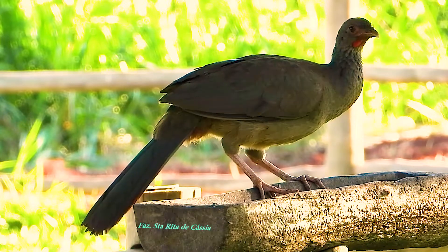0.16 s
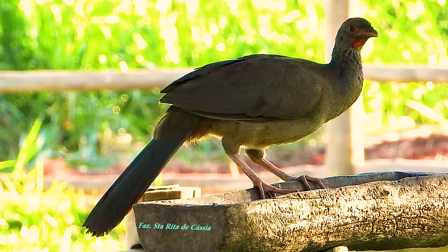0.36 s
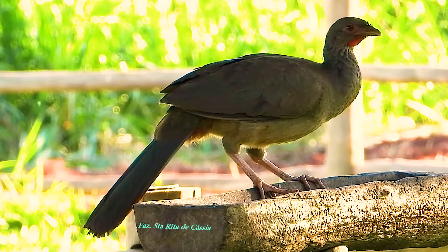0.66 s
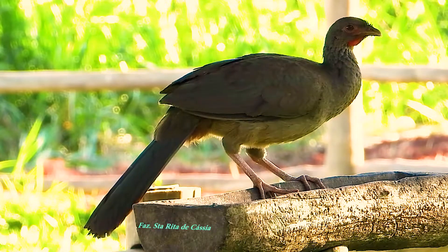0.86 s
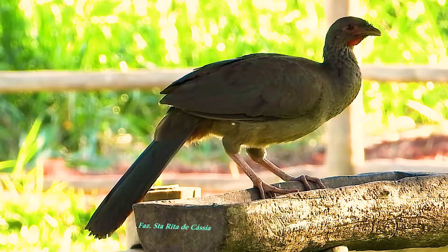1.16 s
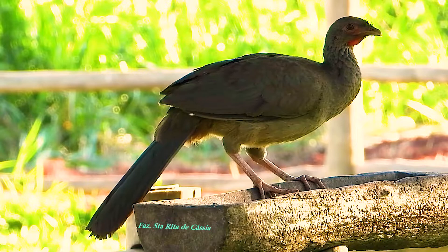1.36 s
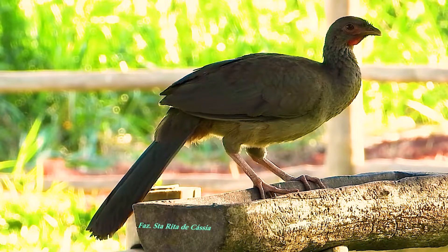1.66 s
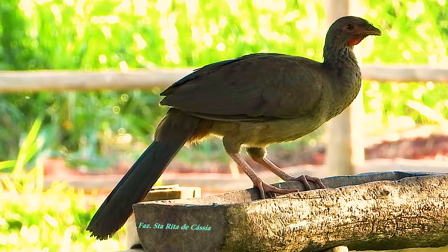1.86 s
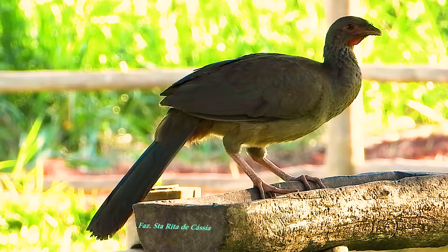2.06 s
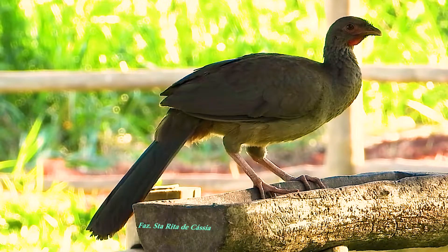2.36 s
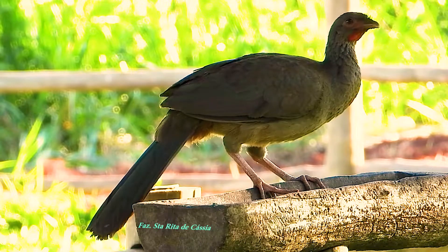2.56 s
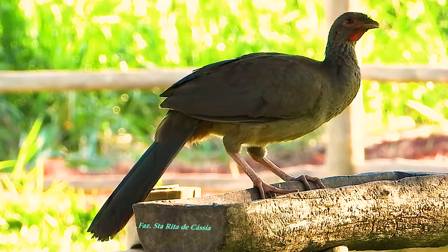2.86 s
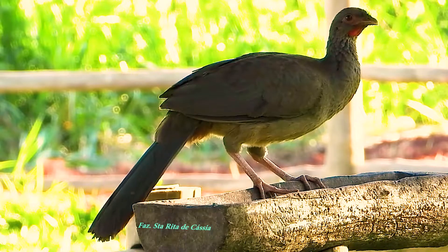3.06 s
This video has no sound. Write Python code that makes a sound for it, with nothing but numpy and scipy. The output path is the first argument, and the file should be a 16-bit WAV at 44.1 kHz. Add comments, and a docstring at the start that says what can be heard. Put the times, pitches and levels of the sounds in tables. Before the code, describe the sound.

A raucous, rasping chorus of large birds, rapid and uneven, arrives late, somewhat right of the microphones and blurred by echoes from trees and walls; before it, only faint insects, tiny chirps and a brief rustle.

```python
"""Insects shrill from the first moment over a low rumble and garden air, with other birds chirping here and there.
Then, some way off to the right of the microphones, chachalacas break into a harsh, rasping chorus.
Each syllable is a run of uneven pulses ringing in throat resonances, blurred by echoes from trees and walls.
Something rustles once before the chorus; the insects, air, rumble and a thin whine are filtered noise and a sine."""
import sys
import numpy as np
from scipy import signal
from scipy.io import wavfile
from scipy.ndimage import uniform_filter1d

SR = 44100
rng = np.random.default_rng(int(sys.argv[2]) if len(sys.argv) > 2 else 0)


def materialize(psi):
    """Save the field psi as 16-bit PCM at rate SR to the path in sys.argv[1].

    A 1-D psi becomes a single channel; in a 2-D psi each row is a channel.
    """
    bounded = np.clip(np.atleast_2d(psi).T, -1, 1)
    quanta = np.round(bounded * 32767).astype(np.int16)
    wavfile.write(sys.argv[1], SR, quanta)


N = 141561
T = np.arange(N) / SR  # time [s]

# Chorus syllables, levels before the distance gain CHORUS_DB:
# (start [s], length before release [s], pulse rate [Hz], roughness [0-1], ringing tone [Hz], tone level [dB],
#  then four throat levels [dB], one at each of REGISTERS_HZ)
SYLLABLES = [ (1.862, 0.029, 200, 0.48, 1150, -58, -51, -50, -56, -66),
             (1.886, 0.068, 225.3, 0.4, 1362, -43.5, -45.5, -39.5, -45.5, -49.5),
             (1.962, 0.06, 179.5, 0.34, 1177, -48, -50, -51, -46.5, -55),
             (2.007, 0.056, 200, 0.61, 3950, -53, -62, -54, -48, -53),
             (2.068, 0.06, 174.7, 0.55, 760, -56, -45, -46, -43, -56),
             (2.125, 0.054, 175.7, 0.42, 2610, -46, -48.5, -43, -47.5, -48.5),
             (2.286, 0.055, 199.6, 0.51, 1226, -43, -51.5, -43, -40.5, -49),
             (2.363, 0.044, 201.3, 0.69, 2334, -49, -52.5, -47.5, -42, -47),
             (2.412, 0.062, 207, 0.51, 1350, -45.5, -50, -45.5, -41.5, -48),
             (2.477, .11, 205.5, 0.61, 1260, -48, -52, -45, -42.5, -46),
             (2.599, 0.021, 281, 0.39, 840, -44.5, -51, -39, -44.5, -46),
             (2.62, 0.043, 292, 0.3, 3570, -43, -74, -43, -44.5, -44.5),
             (2.729, 0.054, 297.4, .18, 885, -40.5, -54, -37.5, -42.5, -45.5),
             (2.782, 0.041, 297.7, .22, 1212, -49, -49, -44.5, -40.5, -45.5),
             (2.812, .026, 298.5, .3, 875, -46, -52, -43, -47, -43.5),
             (2.858, .045, 257.5, .45, 1304, -47, -75, -48, -50, -48.5),
             (2.9, 0.065, 257, .45, 3560, -53.5, -64, -58, -62, -55.5),
             (3.04, 0.03, 234.4, 0.34, 2620, -43, -50.5, -38, -41.5, -46),
             (3.078, 0.036, 233.7, 0.31, 1144, -43.5, -58, -48, -46, -48.5),
             (3.12, 0.052, 201.4, 0.3, 4340, -49, -60, -52, -49, -55),
             (3.158, 0.049, 199.6, 0.51, 2730, -44, -52.5, -45.5, -54, -50.5)]
# Pitches at which the four throat levels of a syllable apply: (frequency [Hz])
REGISTERS_HZ = [850, 1250, 2700, 4000]
# Throat resonances of the calls: (centre [Hz], width [Hz], level relative to the syllable [dB])
THROAT = [(746, 75, -7.5), (856, 76, -4.5), (1100, 56, -8.5), (1203, 69, -4), (1349, 80, -6.5),
          (1612, 134, -12), (1825, 130, -11.5), (2305, 160, -9.5), (2606, 78, -6), (2803, 160, -6),
          (3149, 92, -4), (3597, 100, -4), (3936, 290, -2.5), (4340, 55, -4), (4827, 155, -6.5),
          (5640, 520, -12)]
ATTACK_S, RELEASE_S = 0.016, 0.012
THROAT_SHIFT = 0.011  # spread of each resonance between syllables, as a share of its pitch
TONE_WAVER, TONE_FLUTTER_DB = 0.069, 3  # waver is a share of pitch at full roughness
HISS_HZ, HISS_DB = 12000, -14.5  # breathy top, relative to the highest register
CHORUS_DB, CHORUS_PAN_DB = -3, 4
ECHO_DB, ECHO_PAN_DB = -0.5, 3


def chachalacas():
    """Each syllable swells, holds and dies away, with its own balance of resonances and one ringing tone."""
    size, lead_in_s = SR // 3, 0.05
    chorus = np.zeros(N + SR)
    t = np.arange(size) / SR - lead_in_s
    for start_s, length, pulse_hz, rough, tone_hz, tone_db, *levels in SYLLABLES:
        source = syrinx(pulse_hz, np.clip(rough, 0, 1), size)
        attack = np.clip(t / ATTACK_S, 0, 1)
        envelope = attack * np.exp(-np.maximum(t - length, 0) / RELEASE_S)

        hiss = rms_one(resonate(source, HISS_HZ, HISS_HZ))
        voice = from_db(HISS_DB + levels[-1]) * hiss
        tone = wavering_tone(tone_hz, TONE_WAVER * rough, TONE_FLUTTER_DB)[:size]
        voice = voice + from_db(tone_db) * tone
        for hz, width, db in THROAT:
            ring = resonate(source, hz * (1 + THROAT_SHIFT * rng.standard_normal()), width)
            # unit power over the audible part of the syllable
            ring /= np.sqrt(np.average(ring ** 2, weights=envelope ** 2))
            register_db = np.interp(np.log(hz), np.log(REGISTERS_HZ), levels)
            voice = voice + ring * from_db(db + register_db)

        first = int((start_s + t[0]) * SR)
        chorus[first:first + size] += voice * envelope
    direct = from_db(CHORUS_DB) * chorus[:N]
    echoes = from_db(ECHO_DB) * pan(ECHO_PAN_DB) * garden(direct)
    return direct * pan(CHORUS_PAN_DB) + echoes


# At full roughness: spread of log pulse gaps, spread of pulse strength, share of rasp
JITTER, SHIMMER_DB, RASP = 0.22, 5, 0.85
RASP_S = 0.0023  # decay time of the air after each pulse
RATTLE_HZ, RATTLE_DB = 129.5, 3.5  # random turns per second, spread at full roughness


def syrinx(pulse_hz, rough, size):
    """Uneven pulses, each followed by a short rasp of air, swelling and dropping in uneven bursts when rough."""
    gaps, strengths = rng.standard_normal((2, 200))
    gap_s = np.exp(JITTER * rough * gaps) / pulse_hz
    at = (np.cumsum(gap_s) * SR).astype(int)
    inside = at < size
    pulses = np.zeros(size)
    pulses[at[inside]] = from_db(SHIMMER_DB * rough * strengths[inside])

    puffs = signal.lfilter([1], [1, -np.exp(-1 / (RASP_S * SR))], pulses)
    air = puffs * rng.standard_normal(size)
    rattle = from_db(RATTLE_DB * rough * drift(RATTLE_HZ)[:size])
    return (rms_one(pulses) + RASP * rough * rms_one(air)) * rattle


GARDEN_T60_S, ECHO_DELAY_S = 0.61, 0.012
ECHO_SPREAD = 0.59  # strength of the left-right difference against the shared part


def garden(x):
    """Scattered echoes from trees and walls, dying away exponentially and partly shared by both sides."""
    t = T[:SR]
    reflections = rng.standard_normal((2, SR))
    reflections = reflections * (rng.random((2, SR)) < 0.05)  # sparse
    mid, side = reflections * (t > ECHO_DELAY_S) * from_db(-60 * t / GARDEN_T60_S)
    echoes = mid + ECHO_SPREAD * side * [[1], [-1]]
    echoes /= np.sqrt(np.sum(echoes ** 2, axis=1, keepdims=True))
    return signal.fftconvolve(x[None], echoes, axes=1)[:, :N]


# Other birds about the garden:
# (start [s], length [s], start pitch [Hz], end pitch [Hz], hoarseness [share of pitch], level before the swell [dB])
CHIRPS = [(0.217, 0.033, 2330, 2210, 0.037, -56), (.228, 0.033, 3600, 4250, .035, -56.5),
          (.74, 0.043, 1700, 1844, 0.084, -62), (0.769, .08, 2900, 4350, .015, -58),
          (0.908, 0.019, 2300, 2360, .04, -52), (1.138, .062, 4720, 4660, .028, -52),
          (1.134, 0.067, 3310, 3250, 0.026, -55.5), (1.22, .016, 4500, 3950, .02, -53.5),
          (1.263, .016, 4050, 4120, .02, -58), (1.675, 0.097, 1260, 1310, .04, -55.5),
          (1.763, 0.046, 2694, 2670, 0.0167, -52.5), (2.366, 0.019, 6070, 5740, 0.016, -41.5),
          (2.772, .088, 2900, 3010, .05, -38), (2.855, .085, 2120, 1980, .06, -48),
          (2.92, .105, 2000, 1975, .028, -48.5), (2.904, 0.14, 1780, 1770, 0.071, -48.5)]
TRILL_HZ, TRILL_UNEVEN = 51.8, 0.147
TRILL_PER_HOARSENESS = 12  # hoarser notes trill more deeply
CHIRP_FLUTTER_DB, CHIRP_ECHO_DB = 2.5, -3


def other_birds():
    """Whistles and hoarse, trilled squeals that glide from one pitch to another, with garden echoes."""
    notes = 0
    for start_s, length, start_hz, end_hz, hoarse, db in CHIRPS:
        u = np.clip((T - start_s) / length, 0, 1)  # progress through the note
        trill_hz = TRILL_HZ * (1 + TRILL_UNEVEN * drift(TRILL_HZ))
        beat = np.cos(2 * np.pi * np.cumsum(trill_hz) / SR)
        trill = 1 + np.clip(TRILL_PER_HOARSENESS * hoarse, 0, 1) * beat
        glide_hz = start_hz + (end_hz - start_hz) * u
        note = rms_one(wavering_tone(glide_hz, hoarse, CHIRP_FLUTTER_DB) * trill)
        swell = np.sqrt(2 * u * (1 - u))
        notes = notes + note * swell * from_db(db)
    return notes + from_db(CHIRP_ECHO_DB) * garden(notes)


# Brushes of the rustle:
# (peak time [s], rise [s], decay [s], centre [Hz], width [Hz], level at the peak [dB])
BRUSHES = [(1.474, 0.0034, .011, 2530, 900, -49), (1.490, 0.0018, 0.0053, 4570, 1700, -43),
           (1.492, 0.0028, .008, 11500, 3800, -48.5), (1.496, 0.038, 0.03, 7140, 8600, -49),
           (1.535, .03, .035, 13600, 3200, -60)]
RUSTLE_ECHO_DB = -11


def rustle():
    """A quick run of noise brushes, dull first and bright last, with a snap, as of feathers or a leaf."""
    brushes = sum(swish(*brush) for brush in BRUSHES)
    return brushes + from_db(RUSTLE_ECHO_DB) * garden(brushes)


# A faint high hiss that comes and goes:
# (peak time [s], rise [s], decay [s], centre [Hz], width [Hz], level at the peak [dB])
HIGH_HISS = (2.5, 0.26, 0.6, 9300, 1700, -59)


def high_hiss():
    """One slow swell of high noise, alike on both sides."""
    return swish(*HIGH_HISS)


# Far insect chorus: (centre [Hz], width [Hz], level relative to INSECT_DB [dB])
INSECTS = [(6454, 91, -4.5), (6626, 84, -2.5), (6640, 90, -12.5), (6770, 40, -9), (6558, 720, 1),
           (5363, 230, -15.5)]
INSECT_DB, INSECT_PAN_DB, INSECT_THROB_DB = -50.5, 1.6, 1


def insects():
    """Many far insects merge into a few throbbing, shrill bands of noise."""
    chorus = 0
    for hz, width, db in INSECTS:
        band = rms_one(resonate(rng.standard_normal((2, N)), hz, width))
        chorus = chorus + from_db(db + INSECT_THROB_DB * drift(140)) * band
    return from_db(INSECT_DB) * pan(INSECT_PAN_DB) * chorus


# Spectrum of the garden air: (frequency [Hz], relative level per Hz [dB])
AIR = [(100, 0.5), (150, -4), (220, -7.5), (320, -6), (500, -5.5), (1000, -8), (1600, -8.5), (2400, -6),
       (3500, -10), (5500, -7.5), (8000, -13.5), (12000, -16), (15500, -19.5)]
# How alike the air is at the left and right microphones: (frequency [Hz], likeness [-1 to 1])
LIKENESS = [(120, 1), (240, 0.91), (480, 0.44), (950, 0.17), (3000, 0.26), (7500, 0.082), (11000, 0.24),
            (15000, 0.89)]
AIR_DB, AIR_FLICKER_DB = -51.5, 0.4


def garden_air():
    """Stereo noise in roughly half-octave bands, each with its own flicker and left-right likeness."""
    edges = 85 * 2 ** (np.arange(17) / 2.1)
    air = 0
    white = rng.standard_normal((2, 2, N))
    for k, (low, high) in enumerate(zip(edges, edges[1:])):
        hz = (low + high) / 2
        mid, side = resonate(white[k % 2], hz, high - low)
        alike = np.clip(at_hz(LIKENESS, hz), -1, 1)
        band = np.sqrt(1 + alike) * mid + np.sqrt(1 - alike) * side * [[1], [-1]]
        air = air + from_db(at_hz(AIR, hz) + AIR_FLICKER_DB * drift(25.1)) * band
    return from_db(AIR_DB) * rms_one(air)


# Course of the rumble: (time [s], level [dB])
RUMBLE_LEVEL = [(0, -58.5), (.55, -59.5), (.75, -55.5), (1.0, -60), (1.63, -60), (1.68, -66), (2.0, -64.5),
                (2.25, -60.5), (2.45, -64), (2.86, -56.5), (2.95, -62), (3.21, -59)]
# Bands of the rumble: (centre [Hz], width [Hz], relative level [dB])
RUMBLE = [(59.2, 13, 0.5), (93.4, 27, -7), (32, 48, -16)]
# Steady far drone: (centre [Hz], width [Hz], level [dB])
DRONE = [(151, 37, -73.5), (312.5, 62, -70)]


def rumble():
    """Low bands of noise that follow a level course, over a faint drone, alike on both sides."""
    low = 0
    for hz, width, db in RUMBLE:
        noise = rng.standard_normal(N + SR)
        low = low + from_db(db) * rms_one(resonate(noise, hz, width)[SR:])  # skip the filter's build-up
    low = low / np.sqrt(uniform_filter1d(low ** 2, size=3000) + 1e-9)  # even out before the level course
    drone = sum(from_db(db) * rms_one(resonate(rng.standard_normal(N), hz, width)) for hz, width, db in DRONE)
    return low * from_db(np.interp(T, *np.transpose(RUMBLE_LEVEL))) + drone


def electrical_whine():
    """A thin, steady sine near the top of hearing."""
    whine_hz, whine_db = 15735, -66.5
    return from_db(whine_db) * np.sin(2 * np.pi * whine_hz * T) * np.sqrt(2)


def wavering_tone(hz, waver, flutter_db):
    """A tone whose pitch and strength shake quickly; unit power."""
    shaken_hz = hz * (1 + waver * drift(800))
    tone = np.sin(2 * np.pi * np.cumsum(shaken_hz) / SR)
    return rms_one(tone * from_db(flutter_db * drift(220)))


def swish(peak_s, rise_s, decay_s, hz, width_hz, db):
    """A band of noise that swells to a peak and dies away."""
    envelope = np.exp(-np.maximum(peak_s - T, 0) / rise_s - np.maximum(T - peak_s, 0) / decay_s)
    return from_db(db) * envelope * rms_one(resonate(rng.standard_normal(N), hz, width_hz))


def resonate(x, hz, width_hz):
    """A resonance with steep skirts."""
    band = [max(hz - width_hz / 2, 10), hz + width_hz / 2]
    return signal.sosfilt(signal.butter(2, band, "band", fs=SR, output="sos"), x + 1e-18)


def drift(rate):
    """Random wander of spread 1, with straight lines between `rate` random points a second."""
    return rms_one(np.interp(T * rate, np.arange(4000), rng.standard_normal(4000)))


def from_db(db):
    """Decibels to gain."""
    return 10 ** (np.asarray(db) / 20)


def rms_one(x):
    """Scale to unit power."""
    return x / np.sqrt(np.mean(x ** 2) + 1e-20)


def at_hz(points, hz):
    """Read a table on a log-frequency axis."""
    f, v = np.transpose(points)
    return np.interp(np.log(hz), np.log(f), v)


def pan(db):
    """Left and right gains; positive leans right."""
    return from_db(db * np.array([[-1], [1]]))


def scene():
    """Birds and a rustle over the garden background, from the chorus back to the whine."""
    events = chachalacas() + other_birds() + rustle() + high_hiss()
    background = insects() + garden_air() + rumble() + electrical_whine()
    return events + background


def record(dry):
    """What the microphones pick up is cut steeply at the top."""
    cutoff_hz = 15950
    return signal.sosfilt(signal.ellip(12, 0.1, 70, cutoff_hz, fs=SR, output="sos"), dry)


dry = scene()
out = record(dry)
materialize(out)
```